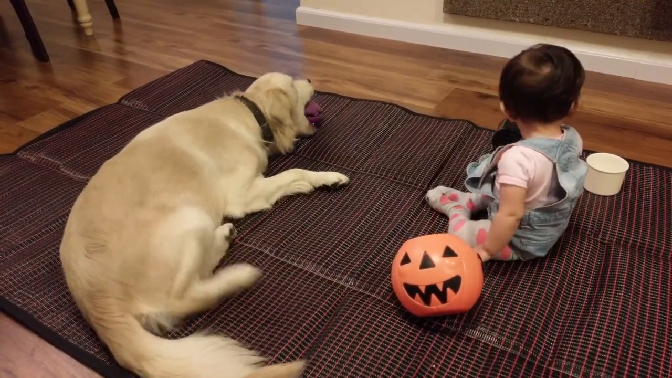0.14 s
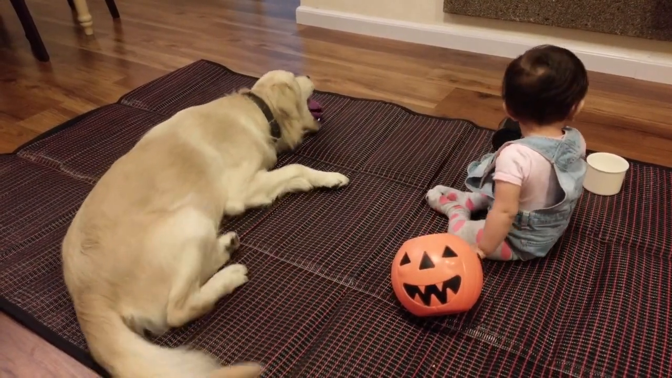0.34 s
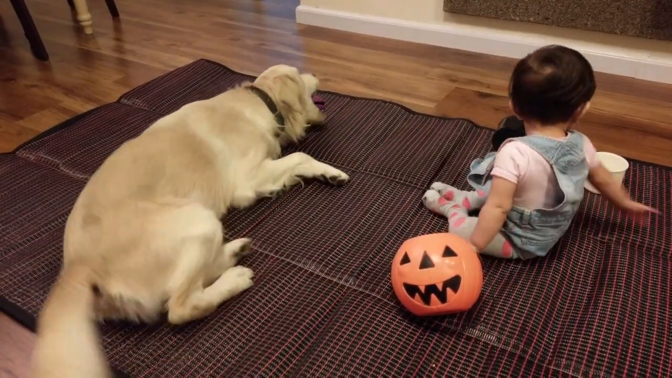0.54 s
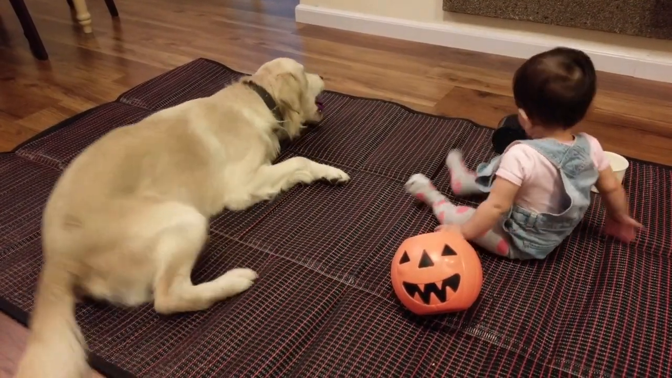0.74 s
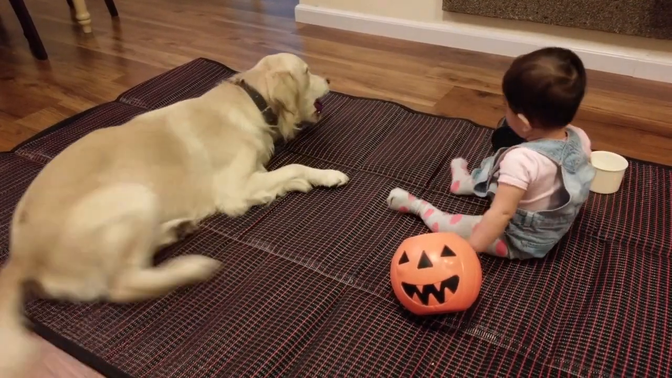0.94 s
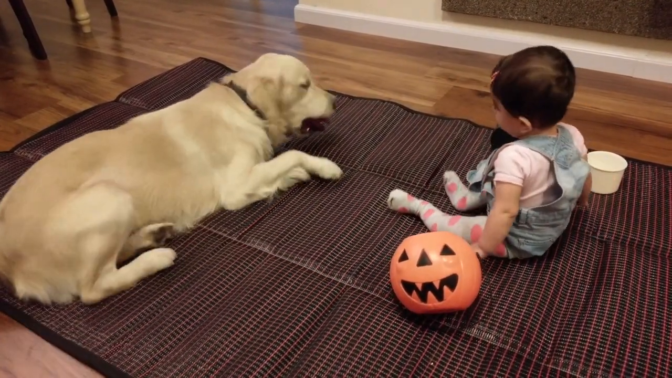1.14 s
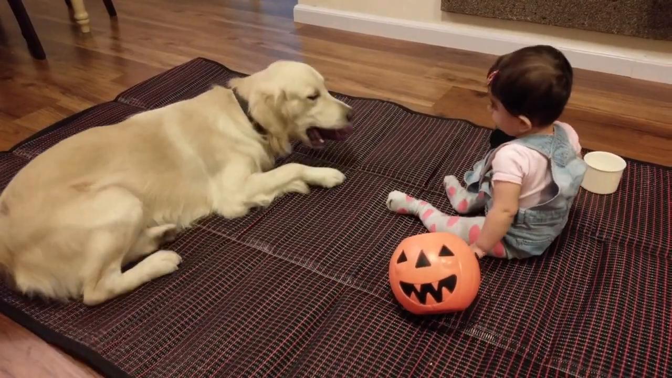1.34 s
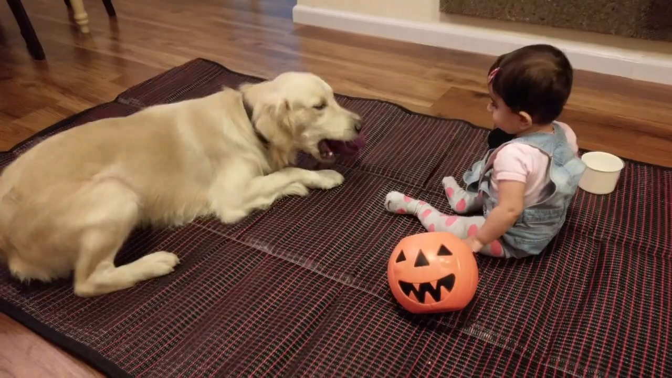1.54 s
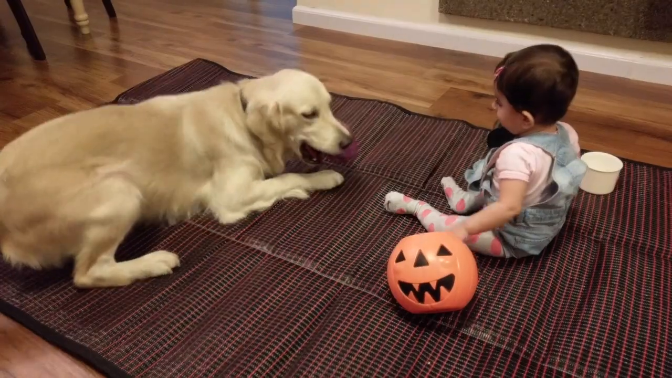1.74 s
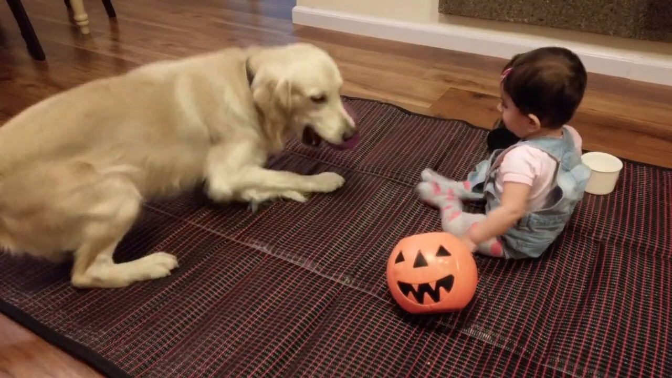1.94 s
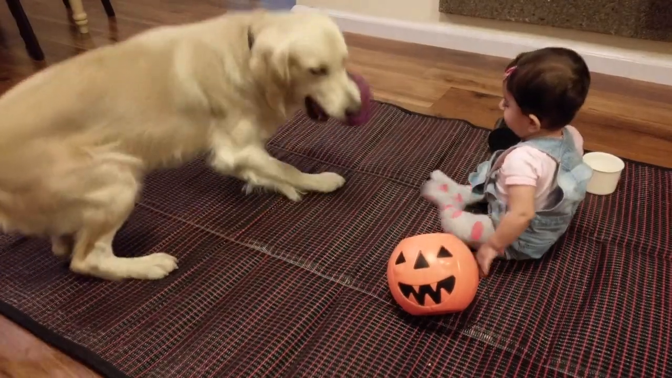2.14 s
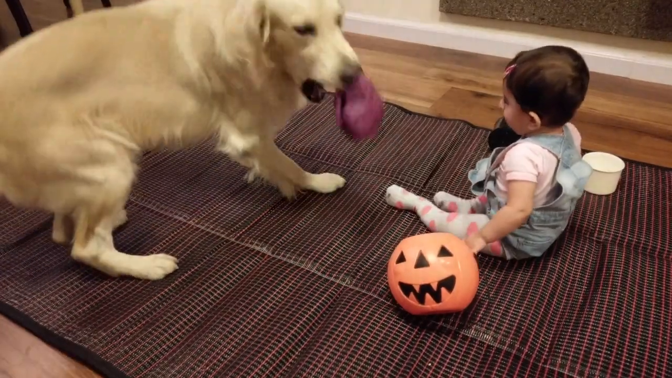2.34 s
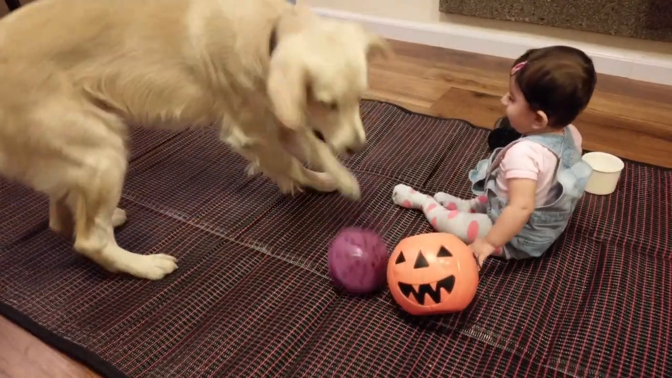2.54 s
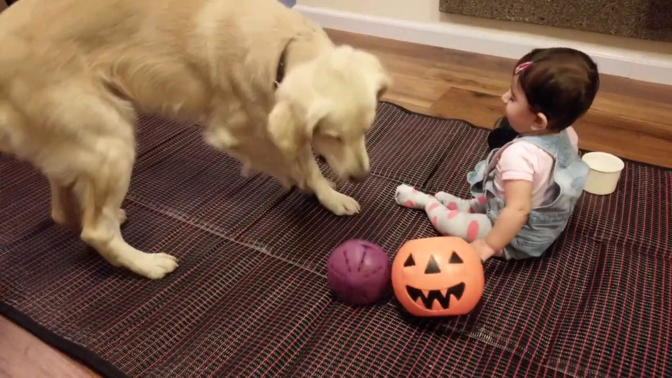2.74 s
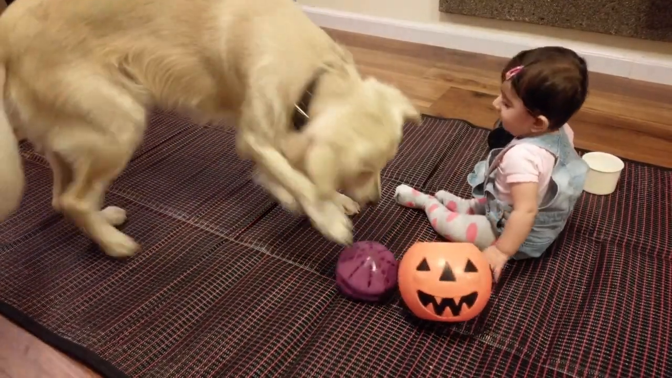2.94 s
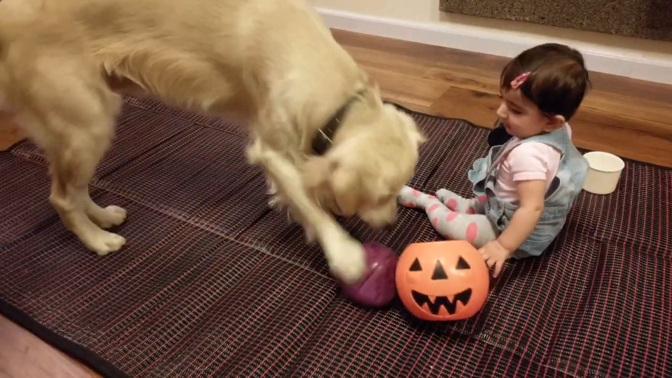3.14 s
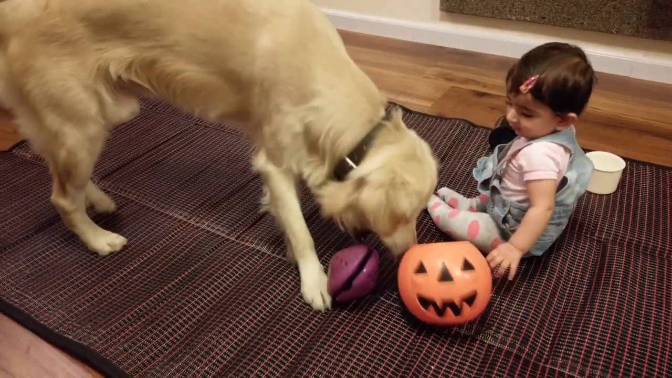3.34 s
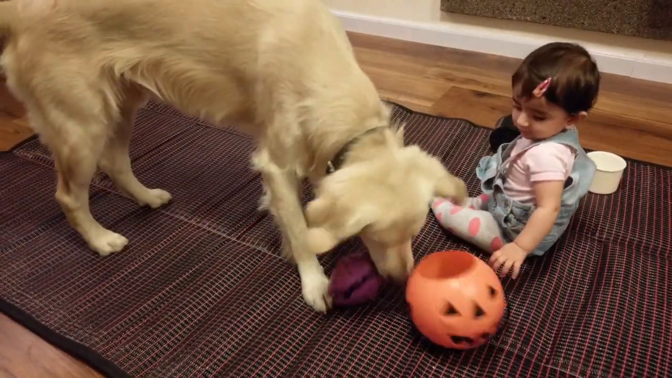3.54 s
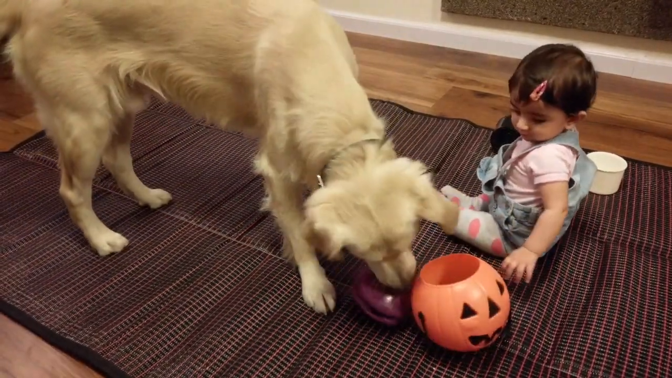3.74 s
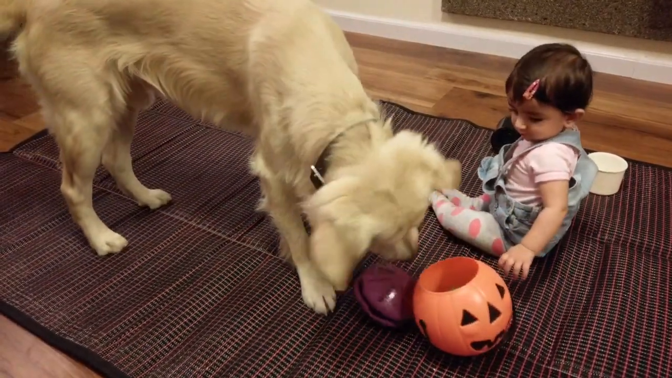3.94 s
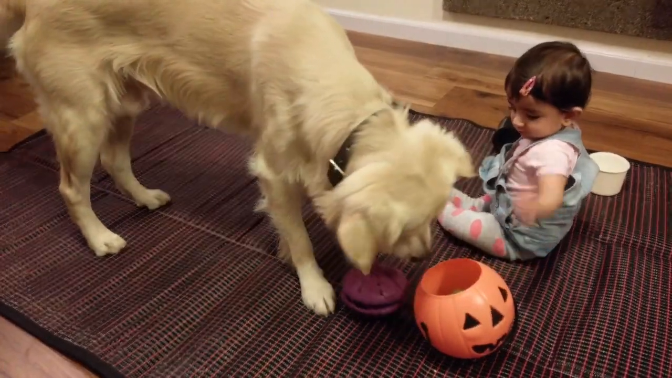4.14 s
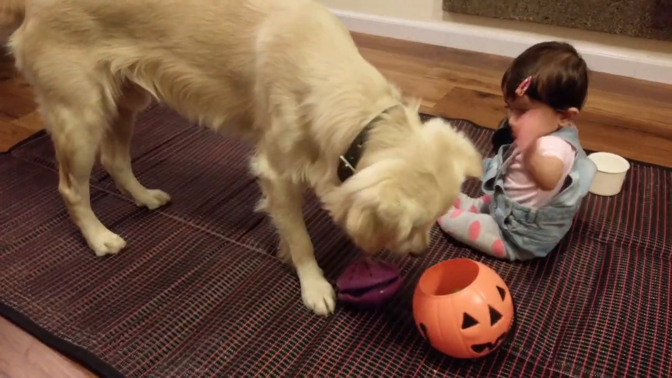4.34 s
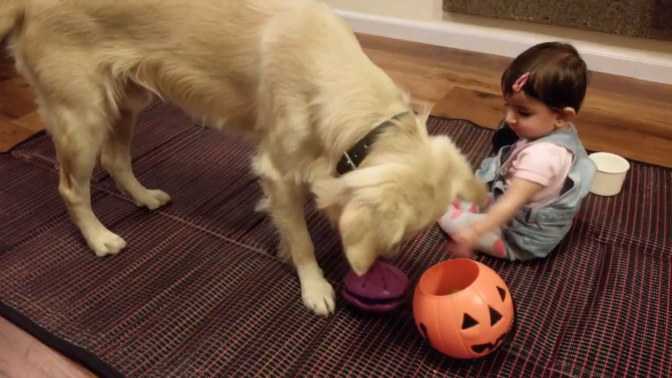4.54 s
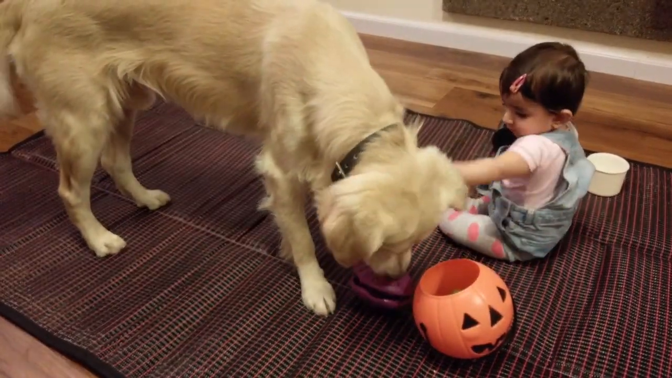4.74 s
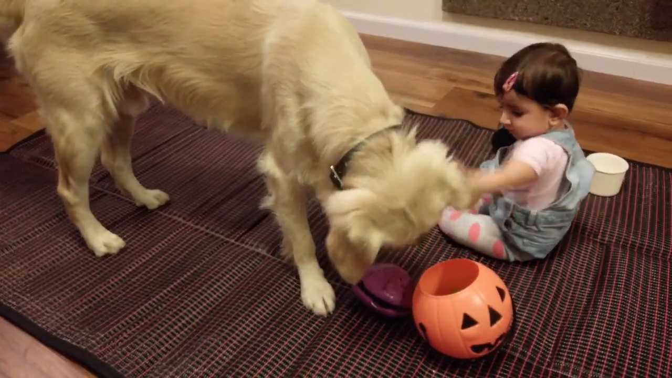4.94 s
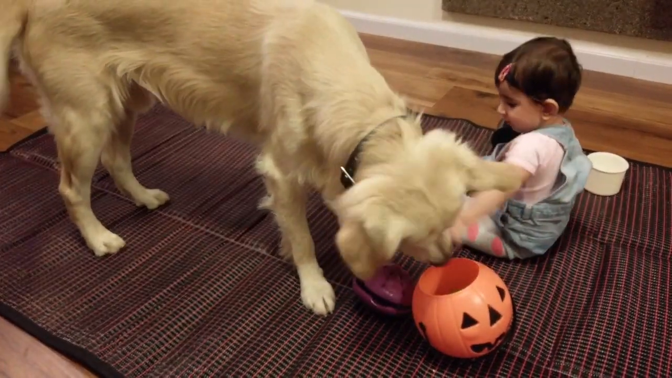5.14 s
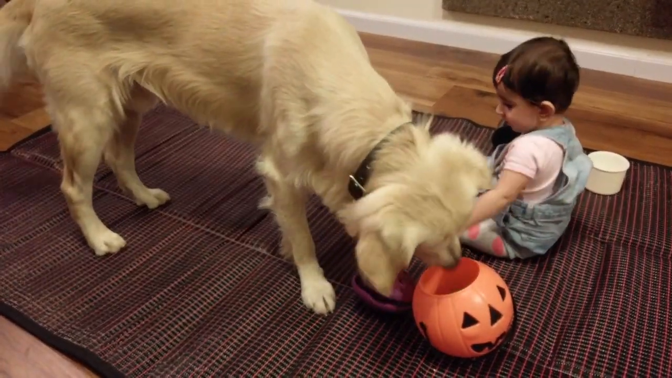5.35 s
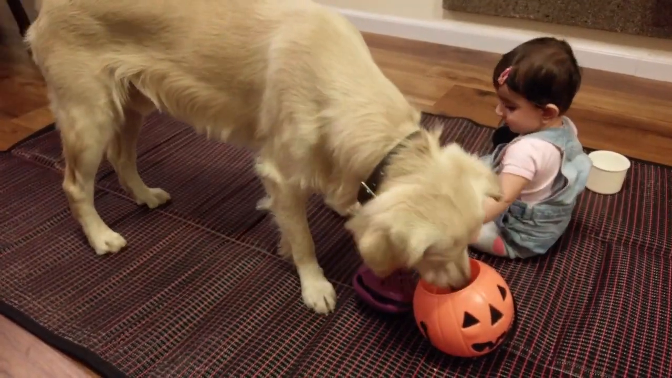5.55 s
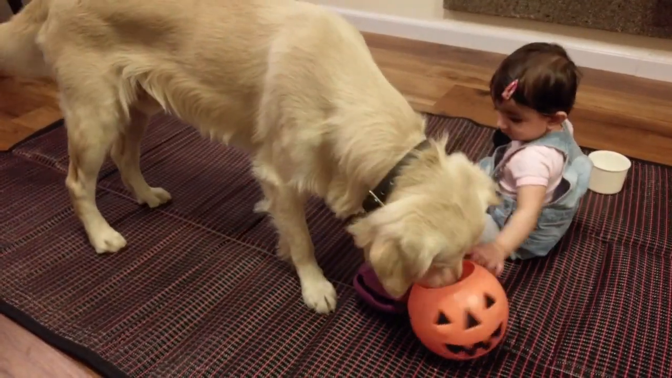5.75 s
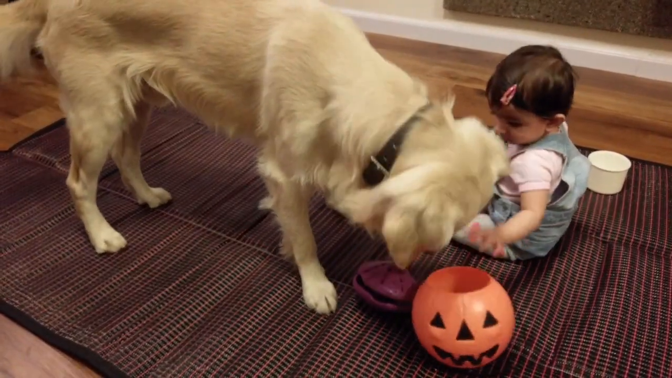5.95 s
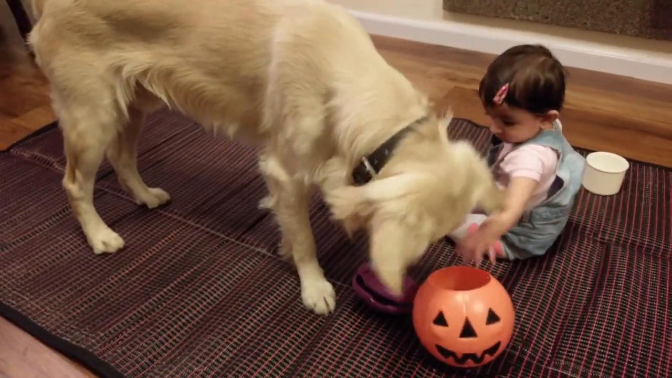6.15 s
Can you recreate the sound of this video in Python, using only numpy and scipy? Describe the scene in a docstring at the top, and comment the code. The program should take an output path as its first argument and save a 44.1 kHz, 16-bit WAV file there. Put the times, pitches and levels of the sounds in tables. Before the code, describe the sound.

For the first two seconds a dog shifts on a woven mat: soft brushing of fur and paws, with a few dry ticks from the strands. Faint paw bumps follow. At about 2.5 seconds a hard hollow ball lands with one sharp knock and a short thud from the floorboards beneath, far louder than anything else. From 2.7 to about 4.1 seconds the dog noses the ball against a plastic bucket, making a quick, uneven run of light hollow taps, clicks and short scrapes over the mat. A small click comes at 4.4 seconds and a faint bump near 5.1. A few softer rubs and hollow taps occur between 5.5 and 6.1 seconds. A faint low appliance hum and room rumble continue throughout. The living room adds a slight echo, and the right side sounds muffled.

```python
"""Dog with a ball and a bucket

A dog shifts on a woven mat in a living room, gets up and drops a hard hollow ball by a plastic bucket.
It noses both toys about: they tap each other and scrape over the weave, which rustles and snaps.
An appliance hums low in the room; the right microphone port is covered and sounds muffled."""
import sys
import numpy as np
from scipy import signal
from scipy.fft import rfft, irfft, next_fast_len
from scipy.io import wavfile

SR = 44100
rng = np.random.default_rng(int(sys.argv[2]) if len(sys.argv) > 2 else 0)


def digitize_waveform(pressure):
    """Quantize a signal to 16-bit integers and store it at the path in sys.argv[1].

    Rows of a 2-D input are taken as channels; values are limited to [-1, 1].
    """
    field = np.atleast_2d(pressure).T
    bounded = np.clip(field, -1, 1)
    quanta = np.round(bounded * 32767).astype(np.int16)
    wavfile.write(sys.argv[1], SR, quanta)


N = 277159

# dull rub on the mat: freq_hz, gain_db
RUB_SPECTRUM = [(100, -8), (250, 2.5), (480, -0.5), (720, -1), (1050, -6), (1400, -3.5), (2200, -17.5),
                (4000, -20), (9000, -64)]
# hard contact click: freq_hz, gain_db
CLICK_SPECTRUM = [(100, -27), (400, -36), (1200, 17), (2500, 5), (4500, 1.5), (7500, -1), (10000, -5.5),
                  (12700, -5), (14200, -14.5), (16000, -19)]
# air in the bucket: pitch_hz, level_db, t60_s
CAVITY_MODES = [(356, -16, 0.032), (376, -1, 0.15), (418.3, 10, 0.095), (446, -1.5, 0.15)]
# ball landing, rim then body: start_s, thud_db, crack_db
LANDINGS = [(2.461, -26, -42.5), (2.4649, -6.5, -37)]
MUZZLE_IN_S, MUZZLE_PITCH_RATIO = 5.5, 0.852  # muzzle narrows the bucket's mouth, lowering its air note


def amp(db):
    """Decibels to gain."""
    return 10 ** (np.asarray(db) / 20)


def unit(x):
    """Scale to rms 1."""
    return x / np.sqrt(np.mean(x ** 2) + 1e-20)


def read(points, hz):
    """Interpolate a table over log frequency."""
    freq_hz, value = np.transpose(points)
    return np.interp(np.log(hz + 1), np.log(freq_hz + 1), value)


def add(mix, start_s, sound):
    """Mix a sound in, in place."""
    part = mix[max(round(start_s * SR), 0):][:len(sound)]
    part += sound[:len(part)]


def colour(x, spectrum):
    """Filter by a spectrum table; rms 1."""
    n = next_fast_len(len(x), True)
    gain = amp(read(spectrum, np.fft.rfftfreq(n, 1 / SR)))
    return unit(irfft(rfft(x, n) * gain, n)[:len(x)])


def drift(rate_hz):
    """Slow low-passed noise; rms 1."""
    n = next_fast_len(N, True)
    lowpass = np.exp(-(np.fft.rfftfreq(n, 1 / SR) / rate_hz) ** 2)
    return unit(irfft(rfft(rng.standard_normal(n)) * lowpass, n)[:N])


def envelopes(moves, rise_s, t60_s):
    """Gains of two layers; each move swells, holds and fades."""
    gains = np.zeros((2, N))
    for start_s, length_s, *levels_db in moves:
        t = np.arange(round((length_s + t60_s) * SR)) / SR
        shape = np.minimum(t / rise_s, 1) * amp(-60 * np.maximum(t - length_s, 0) / t60_s)
        for gain, level_db in zip(gains, levels_db):
            add(gain, start_s, amp(level_db) * shape)
    return gains


def slips(rate_per_s, spread_db):
    """Strands catch and let go: random clicks of uneven size."""
    size = amp(spread_db * np.minimum(rng.exponential(1, N), 4))
    return unit(size * rng.choice([-1, 1], N) * (rng.random(N) < rate_per_s / SR))


def resonate(x, centre_hz, stage_width_hz):
    """Two equal band-passes in series; rms 1."""
    b, a = signal.iirpeak(centre_hz, centre_hz / stage_width_hz, SR)
    return unit(signal.lfilter(b, a, signal.lfilter(b, a, x)))


def burst(spectrum, t60_s, grit):
    """Click plus noise trail, roughly flattened, then shaped at minimum phase."""
    t = np.arange(SR // 8) / SR
    trail = rng.standard_normal(len(t)) * amp(-60 * t / t60_s)
    contact = np.fft.fft(signal.unit_impulse(len(t)) + grit * trail / np.linalg.norm(trail))
    gain = amp(read(spectrum, abs(np.fft.fftfreq(len(t), 1 / SR))))
    log_gain = np.log(gain / (abs(contact) + 0.3))
    response = np.exp(signal.hilbert(log_gain).conj())
    return unit(np.fft.ifft(contact * response).real[:len(t) // 2])


def ring(modes, scatter_db=0):
    """Decaying modes; the contact point scatters their levels."""
    t = np.arange(SR // 4) / SR
    return sum(amp(db + scatter_db * rng.uniform(-1, 1) - 60 * t / t60_s) * np.sin(2 * np.pi * hz * t)
               for hz, db, t60_s in modes)


def detuned(modes, ratio):
    """Modes shifted in pitch."""
    return [(hz * ratio, db, t60_s) for hz, db, t60_s in modes]


def radiate(x, cutoff_hz):
    """A small body radiates little bass."""
    return signal.sosfilt(signal.butter(2, cutoff_hz, "highpass", fs=SR, output="sos"), x)


def background():
    """Room rumble and a wavering appliance hum reach both ports; each adds its own hiss."""
    # still air: freq_hz, gain_db
    rumble_spectrum = [(20, -12), (40, -1), (75, -5.5), (120, -9), (155, -16.5), (240, -21), (320, -24),
                       (430, -31), (950, -37), (1500, -43), (2500, -47), (5000, -96)]
    # left-right likeness of the rumble: freq_hz, correlation
    rumble_coherence = [(30, 0.25), (100, 0.67), (300, 0.38), (700, 0.026), (1500, 0.39), (3000, 0)]
    # appliance: pitch_hz, level_db, waver_hz
    hum_partials = [(48.5, -54, 1.34), (99.1, -59, 4.8)]
    # microphone noise: freq_hz, gain_db
    hiss_spectrum = [(300, 8), (1500, 0), (3000, 1), (6500, -3.5), (9000, -3.5), (12700, 3.5), (15500, -2)]
    hz = np.fft.rfftfreq(N, 1 / SR)
    gain = amp(read(rumble_spectrum, hz)) * (hz / np.hypot(hz, 30)) ** 2
    left, independent = rfft(rng.standard_normal((2, N))) * gain
    coherence = read(rumble_coherence, hz)
    right = coherence * left + np.sqrt(1 - coherence ** 2) * independent
    rumble = irfft(np.array([left, right]), N) / np.std(irfft(left * (hz > 150), N))
    t = np.arange(N) / SR
    hum = np.zeros(N)
    for pitch_hz, level_db, waver_hz in hum_partials:
        peak = np.sqrt(2) * amp(level_db + 0.5 * drift(rate_hz=3.3))
        cycles = pitch_hz * t + np.cumsum(waver_hz * drift(rate_hz=8.04)) / SR
        hum += peak * np.sin(2 * np.pi * cycles)
    hiss = np.array([colour(noise, hiss_spectrum) for noise in rng.standard_normal((2, N))])
    balance = amp([[-0.5], [0.5]])
    return (amp(-64) * rumble + hum) * balance + amp(-68) * hiss


def weave():
    """Many strands hiss in clumps, with a few larger crackles."""
    # strand hiss: freq_hz, gain_db
    spectrum = [(800, 4.5), (2000, 0.5), (3800, 2), (7000, -1.5), (10000, 1), (12500, 7), (14500, -0.5),
                (15900, -5)]
    fine = slips(rate_per_s=6000, spread_db=-1.5) * amp(0.71 * drift(rate_hz=45.6))
    coarse = slips(rate_per_s=160, spread_db=2.5)
    return colour(fine + 0.4 * coarse, spectrum)


def paws():
    """Fur and pads brush the mat; more weight gives a duller rub."""
    # strokes over the mat: start_s, length_s, hiss_db, weight_db
    strokes = [(0, 0.021, -48, -51), (.03, 0.072, -45.5, -55.5), (.51, 0.041, -58, -74),
               (.56, 0.089, -53, -53.5), (.675, 0.12, -54, -52), (.83, 0.058, -50, -69),
               (.89, 0.052, -50, -69), (1.2, .06, -61.5, -65), (1.31, 0.048, -54.5, -59.5),
               (1.355, 0.059, -55.5, -49.5), (1.43, 0.048, -57, -65), (2.69, 0.034, -52.5, -62),
               (2.825, 0.077, -55, -60.5), (2.91, 0.094, -59, -69), (3.155, 0.037, -51.5, -51),
               (3.405, 0.039, -53, -54), (4.41, .025, -52, -66), (5.14, 0.074, -80, -66)]
    # restless stirring between strokes: time_s, hiss_db, body_db
    stirring = [(0, -64, -66.5), (.5, -62.5, -64.5), (1.15, -65.5, -64.5), (1.6, -69.5, -63),
                (2.15, -66, -62.5), (2.45, -83, -75.5), (4.7, -84, -75), (6.28, -90, -69.5)]
    stroke_hiss, weight = envelopes(strokes, rise_s=0.018, t60_s=0.066)
    time_s, hiss_db, body_db = np.transpose(stirring)
    t = np.arange(N) / SR
    hiss_gain = np.hypot(stroke_hiss, amp(np.interp(t, time_s, hiss_db)))
    body_gain = np.hypot(amp(-5.5) * weight, amp(np.interp(t, time_s, body_db)))
    body = colour(slips(rate_per_s=3000, spread_db=-1), RUB_SPECTRUM) * amp(0.5 * drift(rate_hz=35))
    rub = resonate(slips(rate_per_s=2000, spread_db=4.5), centre_hz=704, stage_width_hz=200)
    return hiss_gain * weave() + body_gain * body + amp(-2) * weight * rub


def snaps():
    """Single stiff strands flick back with a dry tick."""
    # strand flicks: start_s, level_db, centre_hz
    flicks = [(0.382, -55, 3220), (0.512, -59, 11000), (0.691, -57, 10500), (1.698, -61.5, 8350),
              (1.812, -68, 9100), (2.2564, -62, 14200), (2.68, -53, 9650), (3.1426, -54, 8800),
              (3.867, -63.5, 6060)]
    out = np.zeros(N)
    for start_s, level_db, hz in flicks:
        spectrum = [(hz / 6, -32), (hz / 2, -9), (hz, 0), (hz * 3, -9)]
        add(out, start_s, amp(level_db) * burst(spectrum, t60_s=0.019, grit=4.3))
    return out


def rubs_and_rings():
    """Fur and nose rubs, and the brief high ring of tapped plastic: grains through one resonance."""
    # rubs and plastic rings: start_s, length_s, level_db, centre_hz, width_hz
    events = [(0.718, 0.092, -56, 2000, 1900), (0.84, 0.04, -50.5, 2050, 1600),
              (1.827, 0.069, -62, 1940, 1100), (2.961, 0.017, -47, 2120, 750),
              (3.166, 0.017, -48, 4600, 2530), (3.689, 0.027, -50, 2180, 900),
              (4.402, 0.022, -56, 3520, 400), (4.423, .1, -70, 2940, 170), (5.541, 0.052, -61, 2460, 1200),
              (5.613, 0.15, -62.5, 2240, 1770), (6.111, 0.024, -65, 3900, 2010)]
    out = np.zeros(N)
    for start_s, length_s, level_db, centre_hz, width_hz in events:
        swell = np.sqrt(abs(np.hanning(round(length_s * SR))))
        grains = rng.standard_normal(len(swell)) * rng.exponential(1, len(swell))
        band = resonate(grains, centre_hz, stage_width_hz=1.47 * width_hz)
        add(out, start_s, amp(level_db) * swell * band)
    return out


def rattle():
    """The light bucket wall chatters: one clack, then three weaker contacts."""
    # wall clack: freq_hz, gain_db
    spectrum = [(500, -33), (1000, 11), (1400, 4), (1800, 8.5), (2400, 4.5), (3200, -2), (5000, -12.5),
                (9000, -25)]
    clack = burst(spectrum, t60_s=0.028, grit=1.7)
    out = clack.copy()
    for delay_s in rng.uniform(0.003, 0.022, 3):
        add(out, delay_s, amp(-11) * rng.choice([-1, 1]) * clack)
    return out


def bucket():
    """Each nudge clicks, rings the wall at a note set by the contact point and booms the air inside."""
    # knocks: start_s, level_db, click_relative_db, pitch_hz
    nudges = [(1.054, -63, -29, 648), (2.663, -52, -24, 687), (2.682, -50.5, -4, 663),
              (2.819, -59, -12, 626), (2.903, -52.5, -23, 671), (2.960, -56.5, -2, 644),
              (3.074, -56, -22, 658), (3.084, -56.5, -1, 665), (3.183, -54, -9, 696),
              (3.263, -60, -11, 670), (3.283, -61, -6, 634), (3.328, -60.5, -8, 555),
              (3.444, -52.5, -1, 670), (3.462, -53.5, -8, 757), (3.468, -55, 0, 702),
              (3.4915, -48, -19, 660), (3.5104, -52, -1, 795), (3.523, -53.5, -6, 730),
              (3.696, -55.5, -7, 670), (3.713, -57.5, -5, 645), (3.827, -52.5, -26, 682),
              (3.843, -54.5, -19, 635), (3.868, -57.5, 3, 850), (3.944, -55, -12, 671),
              (4.084, -65, -13, 730), (4.407, -64, 6.5, 642), (5.618, -68, -16, 697),
              (5.741, -65, -22, 675), (5.869, -75, -16, 707)]
    # plastic wall: pitch_hz, level_db, t60_s
    wall_modes = [(580, 1, 0.072), (679, 13, 0.051), (780, -10, 0.12), (947, 6.5, 0.044), (1287, 14, 0.013),
                  (1405, -20, 0.035)]
    # high wall mode: pitch_hz, level_db, t60_s
    ping_mode = [(5730, 0, 0.11)]
    wall_note_hz = wall_modes[1][0]
    out = np.zeros(N)
    for start_s, level_db, click_relative_db, pitch_hz in nudges:
        wall = unit(ring(detuned(wall_modes, pitch_hz / wall_note_hz), scatter_db=0.6))
        cavity = detuned(CAVITY_MODES, MUZZLE_PITCH_RATIO if start_s > MUZZLE_IN_S else 1)
        boom = amp(-10.5) * unit(ring(cavity, scatter_db=6.9))
        chatter = amp(-4.5) * rattle()
        click = amp(click_relative_db) * burst(CLICK_SPECTRUM, t60_s=0.03, grit=1.5)
        ping = amp(click_relative_db - 28) * unit(ring(ping_mode))
        for part in (wall, boom, chatter, click, ping):
            add(out, start_s, amp(level_db) * part)
    return radiate(out, cutoff_hz=290)


def bumps():
    """Dull bumps with a small click: paws landing and soft knocks on the bucket."""
    # soft contacts: start_s, bump_db, click_db, centre_hz
    contacts = [(1.056, -56.5, -92, 407), (2.3, -62, -77, 1030), (2.402, -68, -88, 1060),
                (2.82, -49, -82, 121), (3.074, -52.5, -77, 128), (4.409, -64, -66, 1350),
                (5.133, -71.5, -80, 1370)]
    out = np.zeros(N)
    for start_s, bump_db, click_db, hz in contacts:
        spectrum = [(hz / 4, -18), (hz, 0), (hz * 2, -7), (hz * 6, -30)]
        add(out, start_s, amp(bump_db) * burst(spectrum, t60_s=0.14, grit=2.6))
        add(out, start_s, amp(click_db) * burst(CLICK_SPECTRUM, t60_s=0.054, grit=3.6))
    return out


def ball():
    """The hollow ball lands and rings with a short knock."""
    # hollow ball: pitch_hz, level_db, t60_s
    modes = [(538, -27.5, 0.14), (578, -17, 0.1), (663, -1, 0.024), (760, -20, 0.064), (870, -29, 0.1),
             (1174, -20.5, 0.043), (1270, -28, 0.012), (1434, -37, .035)]
    out = np.zeros(N)
    for start_s, thud_db, _ in LANDINGS:
        add(out, start_s, amp(thud_db) * radiate(ring(modes), cutoff_hz=97))
    return out


def shell():
    """The ball's hard shell cracks against the mat."""
    # shell impact: freq_hz, gain_db
    spectrum = [(100, -45), (400, -4), (1200, 11.5), (2500, -2.5), (4500, -1.5), (7500, -13), (10000, -9.5),
                (12500, -4), (14000, -13), (16000, -23)]
    out = np.zeros(N)
    for start_s, _, crack_db in LANDINGS:
        add(out, start_s, amp(crack_db) * burst(spectrum, t60_s=0.031, grit=3.3))
    return out


def boards(sag_s=0.00578):
    """The floorboards answer the ball once the mat is pressed flat."""
    # floorboards: pitch_hz, level_db, t60_s
    modes = [(114, -28, 0.15), (133, -26.5, 0.067), (204, -13.5, 0.016), (244, -19.5, 0.18),
             (270, -26, 0.055), (341.6, -27.5, 0.26), (410, -38, 0.045)]
    out = np.zeros(N)
    for start_s, thud_db, _ in LANDINGS:
        add(out, start_s + sag_s, amp(thud_db) * radiate(ring(modes), cutoff_hz=96))
    return out


def pushes():
    """The mat's ribs scrape the sliding plastic and drum on the bucket."""
    # toy slides: start_s, length_s, drum_db, scrape_db
    shoves = [(2.71, .16, -54, -51.5), (2.91, .11, -55.5, -58.5), (3.07, 0.091, -51, -59),
              (3.315, 0.042, -46, -58), (3.475, .105, -47.5, -59), (3.69, 0.059, -47, -67),
              (3.83, 0.12, -56, -55), (3.94, 0.1, -51.5, -63), (4.04, 0.12, -61.5, -65.5),
              (4.41, .1, -64.5, -72), (5.62, 0.06, -57.5, -61), (5.74, 0.17, -65.5, -76)]
    drum_gain, scrape_gain = envelopes(shoves, rise_s=0.016, t60_s=0.19)
    ribs = slips(rate_per_s=900, spread_db=1)
    cavities = [ring(detuned(CAVITY_MODES, ratio)) for ratio in (1, MUZZLE_PITCH_RATIO)]
    booms = [signal.oaconvolve(ribs, cavity)[:N] for cavity in cavities]
    mouth_open, mouth_narrowed = (unit(radiate(boom, cutoff_hz=310)) for boom in booms)
    drum = np.where(np.arange(N) / SR > MUZZLE_IN_S, mouth_narrowed, mouth_open)
    scrape = colour(slips(rate_per_s=530, spread_db=3), RUB_SPECTRUM)
    return drum_gain * drum + scrape_gain * scrape


def room(x, wet_db, width=0.1):
    """Direct sound plus sparse reflections; width sets how much the two ports differ."""
    # reverberation: freq_hz, t60_s
    decay = [(120, 0.65), (400, 0.65), (1000, 0.67), (2800, 0.6), (7000, 0.61), (14000, 0.29)]
    t = np.arange(SR) / SR
    taps_per_s, predelay_s = 3000, 0.0061
    taps = rng.choice([-1., 1.], (2, SR)) * (rng.random((2, SR)) < taps_per_s / SR) * (t > predelay_s)
    hz, time_s, frames = signal.stft(taps, SR, nperseg=256)
    fade = amp(-60 * time_s / read(decay, hz)[:, None])
    _, tail = signal.istft(frames * fade, SR, nperseg=256)
    tail /= np.linalg.norm(tail[0])
    tail[1] = (tail[1] * width + tail[0]) / np.hypot(1, width)
    return x + amp(wet_db) * signal.fftconvolve(x[None], tail, axes=1)[:, :N]


def ports(x, muffle_hz=280, right_db=-2.06, lag_samples=5):
    """The covered right port loses treble and lags slightly."""
    pole = np.exp(-2 * np.pi * muffle_hz / SR)
    late = np.pad(x[1], (lag_samples, 0))[:N]
    return np.array([x[0], amp(right_db) * signal.lfilter([1 - pole], [1, -pole], late)])


def scene():
    """All sources in the room, at the two ports."""
    drop = room(ball(), wet_db=-4, width=0.41)
    drop += room(shell(), wet_db=-6.5, width=0.6)
    drop += room(boards(), wet_db=-4, width=0.17)
    toys = room(bucket(), wet_db=-5, width=0.68) + room(pushes(), wet_db=-5, width=0.97)
    mat = room(paws() + bumps() + rubs_and_rings(), wet_db=-6, width=0.61) + room(snaps(), wet_db=-6.5)
    return ports(drop + toys + mat) + background()


def record(dry):
    """Steep band limit."""
    cutoff_hz = 15900
    lowpass = signal.firwin(511, cutoff_hz, window=("kaiser", 9), fs=SR)
    return signal.oaconvolve(dry, lowpass[None], "same")


dry = scene()
out = record(dry)
digitize_waveform(out)
```